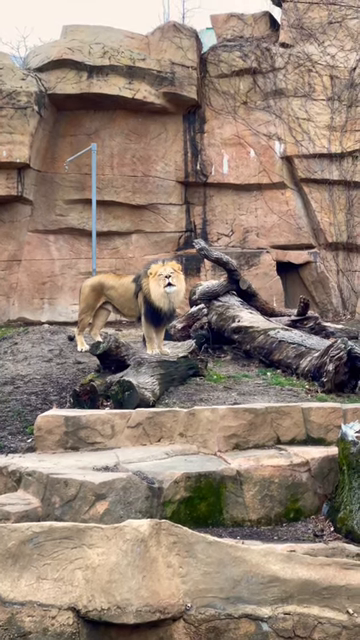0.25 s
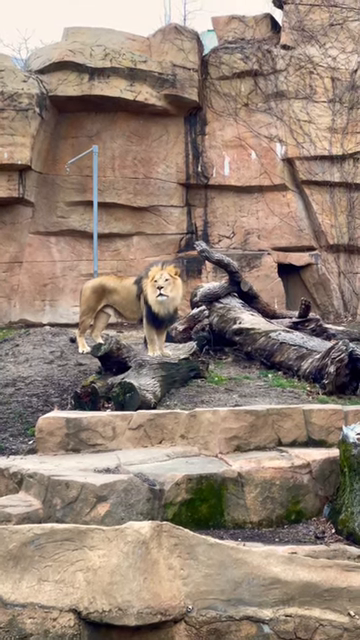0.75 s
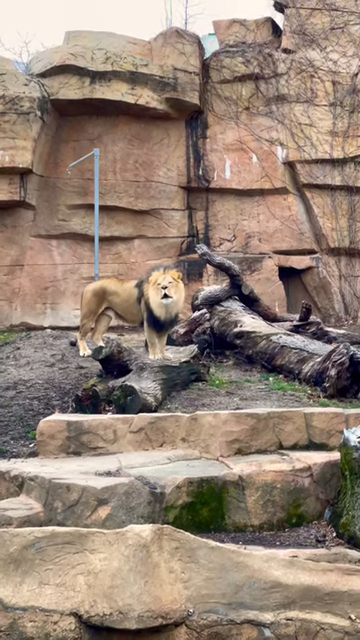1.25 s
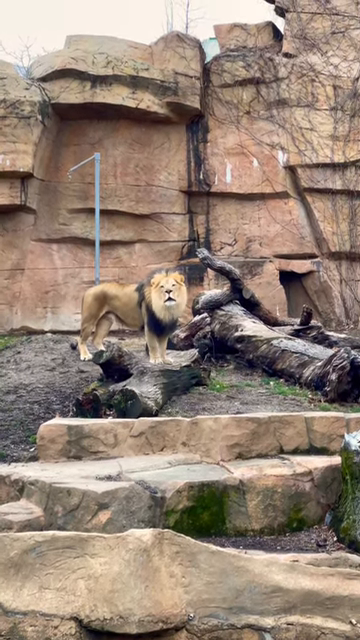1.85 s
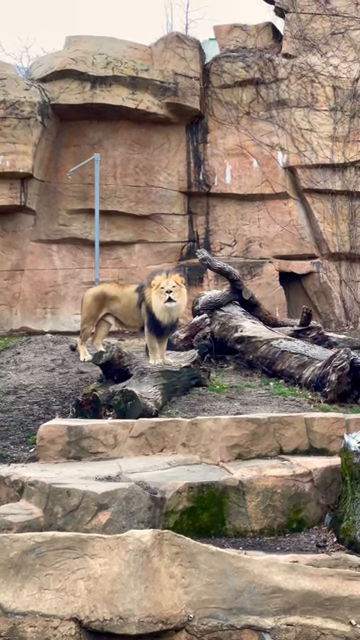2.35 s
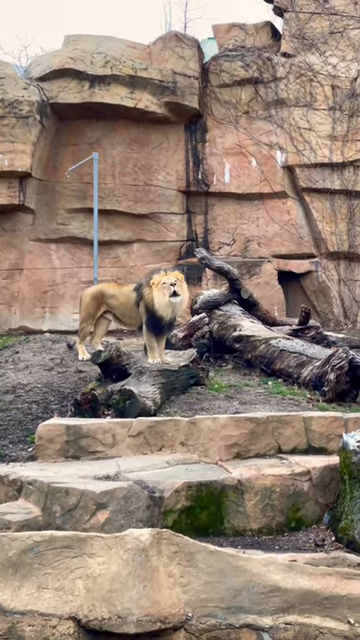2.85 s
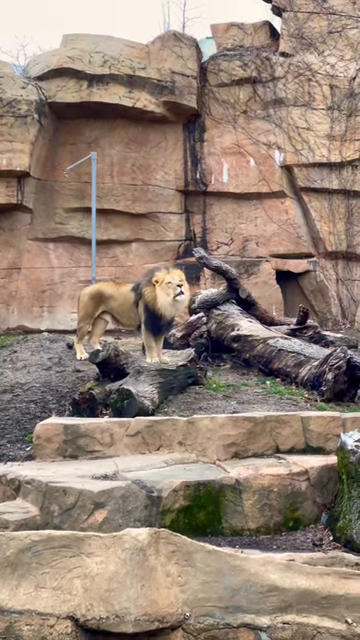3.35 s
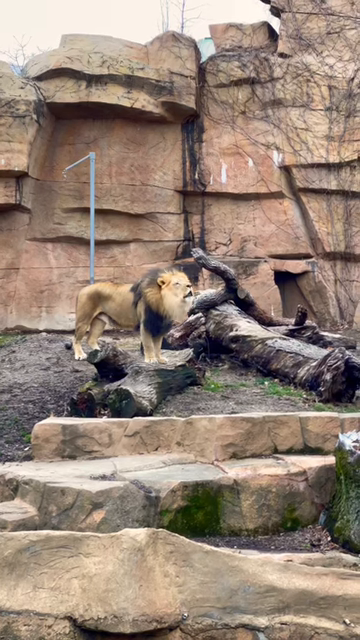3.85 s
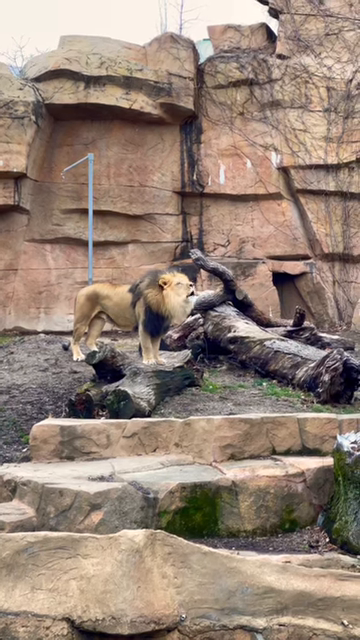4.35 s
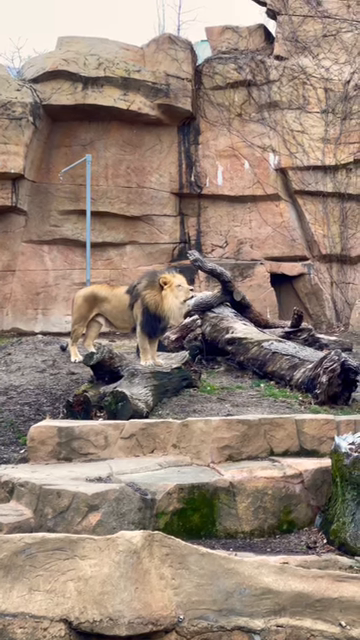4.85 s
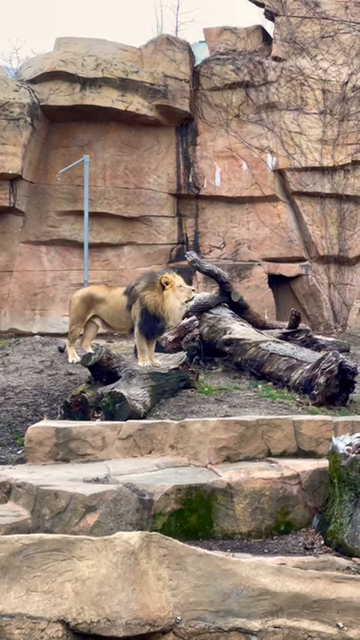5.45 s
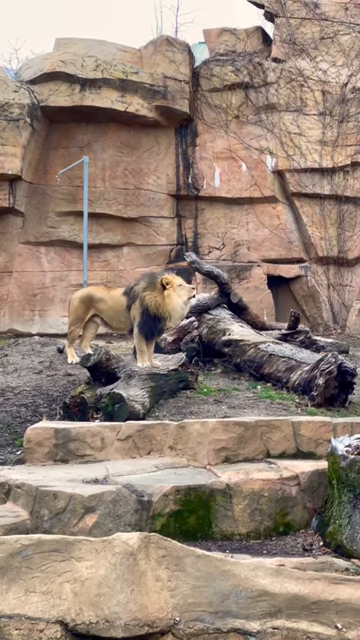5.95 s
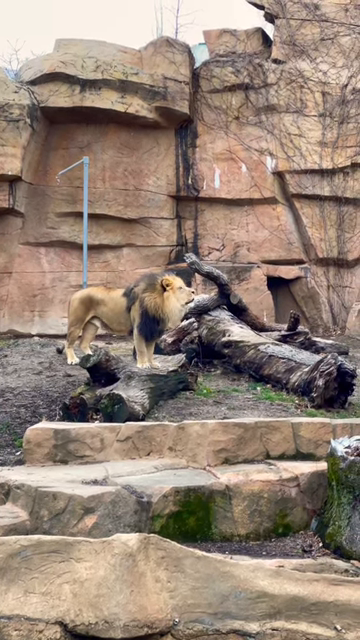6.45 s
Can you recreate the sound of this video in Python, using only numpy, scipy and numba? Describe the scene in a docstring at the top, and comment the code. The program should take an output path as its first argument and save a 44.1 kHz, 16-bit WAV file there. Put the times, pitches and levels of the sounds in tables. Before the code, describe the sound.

A lion gives five deep, rough, grunting roars, echoing off rock walls over a low rumble of distant traffic.

```python
"""A rock-walled outdoor enclosure: a lion grunts five deep roars some metres from a phone.
Each roar is a near-pure chest tone plus rough vocal-fold pulses with a low ring and mouth resonances,
a growl below and rushing breath above; it starts rough, clears, breaks into a creak and sags.
Lion and distant birds echo off the rock, over town rumble."""
import sys
import numpy as np
from scipy import signal
from scipy.fft import rfft, irfft, next_fast_len
from scipy.io import wavfile
from scipy.ndimage import uniform_filter1d
from numba import njit

SR = 44100
rng = np.random.default_rng(int(sys.argv[2]) if len(sys.argv) > 2 else 0)


def file_out(sig):
    """Save sig as 16-bit WAV at sys.argv[1]."""
    # one column per channel
    cols = np.atleast_2d(sig).T
    # limit, then scale
    lim = np.clip(cols, -1, 1)
    pcm = np.round(lim * 32767).astype(np.int16)
    wavfile.write(sys.argv[1], SR, pcm)


N = 295470

# roars (start [s], end [s])
ROAR_SPANS = [(0, .56), (1.23, 1.95), (2.47, 3.3), (4.08, 4.75), (5.65, 6.2)]
# narrow low resonances in the roar, probably the enclosure's (frequency [Hz], width [Hz], gain [dB])
LOW_RING_MODES = [(311.6, 59.7, 3.5), (436.2, 59.6, 0), (520.6, 56, -3), (663, 51, -6.5)]
# vocal tract resonances (frequency [Hz], width [Hz], gain [dB])
MOUTH_MODES = [(835, 64, -4.5), (948, 50, 1.5), (1084, 48, -5.5), (1360, 175, -15)]
PHARYNX_MODES = [(1954, 150, 4), (2420, 280, -5.5), (3110, 190, -3.5), (4280, 540, -8.5)]


def lion():
    """Fold pulses and breath drive the resonances. Returns (chest tone, rough voice)."""
    # per roar (time [s], voice [dB], mouth re low ring [dB], rasp [dB])
    effort = [
        [(0.0, -28, -3.5, -34), (0.006, -32.5, -6.5, -53), (0.102, -29.5, -8, -47.5), (0.126, -34, -5.5, -48),
         (0.144, -28, -9, -49), (0.26, -28, -7, -39.5), (0.358, -34.5, -7.5, -45.5), (0.364, -35.5, -14, -49.5),
         (0.56, -56, -3, -72.5)],
        [(1.23, -70, 0.5, -80.5), (1.284, -36, -2, -55.5), (1.354, -27, -12, -45.5), (1.364, -33, -3, -45.5),
         (1.606, -24, -12, -41), (1.736, -34.5, -4.5, -45), (1.754, -27.5, -14.5, -41), (1.772, -35, -9, -50.5),
         (1.95, -49, -6.5, -70.5)],
        [(2.47, -62, -3, -76.5), (2.584, -28.5, -4.5, -45), (2.718, -30.5, -10, -46.5),
         (2.834, -33.5, -0.5, -43), (3.038, -30, -2, -44), (3.05, -27, -14, -37), (3.074, -31.5, -5, -36),
         (3.148, -32, -12, -58.5), (3.3, -58.5, 0, -60.5)],
        [(4.08, -73, -10.5, -78), (4.164, -29, -6.5, -53.5), (4.234, -31.5, -3.5, -46.5),
         (4.268, -28, -11.5, -46), (4.356, -27.5, -6.5, -41.5), (4.522, -37.5, -2.5, -44.5),
         (4.538, -30, -5.5, -40), (4.582, -40, -1, -51), (4.75, -53, -14.5, -75)],
        [(5.65, -54, -17, -80), (5.664, -61, -9, -84), (5.732, -39, -13, -58), (5.834, -29, -11.5, -52),
         (5.864, -32, -2, -49), (5.886, -27.5, -12, -50.5), (5.98, -34.5, -4, -43.5), (6.112, -42.5, -9, -65.5),
         (6.2, -57, -10, -69)],
    ]
    # chest resonances (frequency [Hz], width [Hz], gain [dB])
    chest_modes = [(47.3, 49, -9.5), (87.6, 32, 7), (168, 49, -1.5)]
    voice_db, mouth_db, rasp_db = curves(effort)
    fold_state, (hiss_db, growl_db, mouth_hz, pharynx_hz) = roar_stages()
    source, air, rattle = vocal_folds(*fold_state)
    rasp = breath_rasp(source, air, pharynx_hz, hiss_db)
    low_ring = unit(ring(source, LOW_RING_MODES))
    voice = low_ring + undb(mouth_db) * vowel(source, MOUTH_MODES, mouth_hz, width_hz=220.)
    growl = unit(ring(rattle, chest_modes))
    roar = undb(voice_db) * voice + undb(rasp_db) * rasp + undb(growl_db) * growl
    t = np.arange(N) / SR
    roaring = sum((t >= start) & (t < end) for start, end in ROAR_SPANS)
    gate = uniform_filter1d(roaring * 1., SR // 25, mode="nearest")
    return gate * chest_tone(), gate * roar + fold_slaps()


def roar_stages():
    """Fold and tract curves: rough onset, clear moment, break, sagging end."""
    # per roar (clearest [s], break [s], pulse rate [Hz], roughness when clearest [0-1], break creak [0-1])
    breaks = [(.07, .24, 138, .5, .45), (1.4, 1.54, 137, .4, .6), (2.87, 3.05, 138, .12, .4),
              (4.25, 4.4, 125, .55, .3), (5.83, 5.94, 115, .3, .45)]
    # per roar (hiss re rasp [dB], growl at break [dB], mouth centre [Hz], pharynx centre [Hz])
    timbres = [(-5.5, -23.5, 928, 2770), (-4.5, -21.5, 966, 2600), (-3.5, -28, 1017, 2460),
               (-2, -24, 950, 2700), (-4, -28, 896, 2600)]
    onset_ratio, broken_ratio, end_ratio = .94, .87, .79  # of the clear pulse rate
    onset_rough, broken_rough, calm_creak = .58, .87, .1
    clearing_s, breaking_s = .06, .06
    growl_early_db, growl_db_per_s = -10.5, -22
    hiss_break_db, hiss_db_per_s = -1.5, -37.5
    folds, tract = [], []
    for (start, end), course, timbre in zip(ROAR_SPANS, breaks, timbres):
        clear_s, break_s, hz, rough, creak = course
        hiss_db, growl_db, *vowel_hz = timbre
        strain_s = break_s - breaking_s
        folds += [(start, onset_ratio * hz, onset_rough, calm_creak),
                  (clear_s - clearing_s, hz, onset_rough, calm_creak),
                  (clear_s, hz, rough, 0),
                  (strain_s, (1 + broken_ratio) / 2 * hz, (rough + broken_rough) / 2, calm_creak),
                  (break_s, broken_ratio * hz, broken_rough, creak),
                  (end, end_ratio * hz, broken_rough, creak / 2)]
        tract += [(s, hiss_db, growl_db + growl_early_db, *vowel_hz) for s in (start, strain_s)]
        tract += [(s, hiss_db + hiss_break_db + hiss_db_per_s * (s - break_s),
                   growl_db + growl_db_per_s * (s - break_s), *vowel_hz) for s in (break_s, end)]
    return curves([folds]), curves([tract])


def vocal_folds(hz, roughness, creak_share, creak_hz=45.28):
    """Folds flap unevenly: loose pulses, an air puff per cycle, a slow creak throbbing through both."""
    steady, phase = pulses(hz, jitter=.006, scatter_db=1.5)
    ragged, _ = pulses(hz, jitter=.3, scatter_db=2.5)
    creak, creak_phase = pulses(creak_hz * (1 + .08 * walk(12)), jitter=.0793, scatter_db=2.5)
    fold_noise, air_noise = rng.standard_normal((2, N))
    throb = undb(-14 * creak_share * creak_phase + 2.3 * walk(14))
    puffs = unit(fold_noise * np.exp(-phase / .55))
    loose = unit((unit(ragged) + .81 * puffs) * throb)
    flap = np.sqrt(1 - roughness) * unit(steady) + np.sqrt(roughness) * loose
    source = np.sqrt(1 - creak_share) * flap + np.sqrt(creak_share) * unit(creak)
    air = air_noise * (.5 + np.exp(-phase / 3.9)) * throb
    rattle = unit(creak) + 1.56 * fold_noise
    return source, air, rattle


def chest_tone():
    """Deep sine, wavering in level and pitch."""
    # per roar (time [s], level [dB], pitch [Hz])
    contours = [
        [(0, -22, 144), (.058, -20.5, 141), (.156, -19, 129), (.204, -7.5, 126.5), (.238, -22, 116.4),
         (.275, -5, 121), (.315, -22.5, 118.5), (.35, -17.5, 116.9), (.45, -29, 115), (.515, -21, 121),
         (.56, -32.5, 130)],
        [(1.23, -42, 128), (1.338, -11.5, 129), (1.44, -7.5, 128), (1.492, -17.5, 127), (1.528, -7.5, 126),
         (1.558, -18.5, 117.9), (1.64, -24, 119), (1.678, -16, 120), (1.71, -32, 124), (1.81, -22, 118),
         (1.95, -32.5, 100)],
        [(2.47, -53.5, 115), (2.54, -23, 130), (2.596, -9.5, 134), (2.654, -20, 130), (2.7, -8.5, 135),
         (2.735, -16, 141), (2.788, -9, 141), (2.872, -19, 141), (2.94, -10.5, 134), (3.03, -9, 130),
         (3.07, -16, 129), (3.16, -17, 128), (3.23, -23.5, 106), (3.3, -36, 110)],
        [(4.08, -57.5, 130), (4.14, -25, 128), (4.186, -11, 128), (4.245, -18, 128), (4.28, -13.5, 128),
         (4.345, -7.5, 127), (4.412, -21, 130), (4.495, -12.5, 131.7), (4.54, -25.5, 130), (4.56, -14.5, 130),
         (4.68, -34.5, 130), (4.75, -34.5, 128)],
        [(5.65, -51, 122), (5.74, -23.5, 121.2), (5.788, -35.5, 118), (5.838, -12, 116), (5.906, -22.5, 115.4),
         (5.952, -9, 116), (5.985, -27.5, 116), (6.11, -24, 110), (6.136, -42, 108), (6.2, -29.5, 106)],
    ]
    db, hz = curves(contours)
    swell = uniform_filter1d(undb(db + .5 * walk(40)), SR // 60)
    phase_rad = 2 * np.pi * np.cumsum(hz * (1 + .019 * walk(30))) / SR
    return np.sqrt(2) * swell * np.sin(phase_rad)


def breath_rasp(source, air, pharynx_hz, hiss_db):
    """Rushing breath and ringing pharynx, hiss on top."""
    # airflow spectra (frequency [Hz], level [dB])
    breath_spectrum = [(1300, -30), (1650, -6), (1950, -1.5), (2700, -7.5), (3500, -11.5), (4300, -10),
                       (5000, -9.5), (6000, -37)]
    hiss_spectrum = [(4000, -25), (5000, -8), (5500, -0.5), (7000, -5), (8500, -1.5), (10700, -2),
                     (11800, -17), (12400, -26.5), (12900, -58.5)]
    breath = unit(colour(air, breath_spectrum))
    pharynx = vowel(source, PHARYNX_MODES, pharynx_hz, width_hz=400.)
    return unit(breath + undb(-1) * pharynx) + undb(hiss_db) * unit(colour(air, hiss_spectrum))


def fold_slaps():
    """Single hard closures excite the low ring, mouth and pharynx."""
    # closures (time [s], relative level [dB])
    closures = [(0.166, -13.5), (0.241, -18), (0.266, -18), (0.31, -23), (1.256, -31.5), (1.286, -21.5),
                (1.498, -18), (1.54, -8), (1.56, -9.5), (1.604, -19), (1.629, -14.5), (1.649, -11),
                (2.541, -18.5), (2.577, -8.5), (2.592, -22.5), (2.837, -15.5), (2.977, -14.5), (3.049, -17),
                (4.143, -28.5), (4.166, -25), (4.278, -25), (4.346, -14), (4.395, -20), (5.849, -19.5),
                (5.889, -40), (5.936, -19.5)]
    time_s, db = np.transpose(closures)
    clicks = np.zeros(N)
    clicks[(time_s * SR).astype(int)] = undb(db)
    banks = [(LOW_RING_MODES, 31), (MOUTH_MODES, 29.5), (PHARYNX_MODES, 4)]
    return sum(undb(gain_db) * ring(clicks, modes) for modes, gain_db in banks)


def pulses(hz, jitter, scatter_db):
    """One click per cycle, jittered by a share of the period. Returns (clicks, phase 0-1)."""
    cycles = np.cumsum(hz) / SR
    due = np.flatnonzero(np.diff(np.floor(cycles)))
    lateness, size = rng.standard_normal((N // 100, 2))[:len(due)].T.clip(-2, 1.5)
    at = np.clip(due + jitter * lateness * SR / hz[due], 0, N - 1).astype(int)
    clicks = np.zeros(N)
    np.add.at(clicks, at, undb(scatter_db * size))
    return clicks, cycles % 1


def vowel(x, modes, centre_hz, width_hz, drift=.025):
    """Static resonances plus one that follows tongue and jaw."""
    hz = centre_hz * (1 + drift * walk(6))
    moving = sweep(sweep(x, hz, width_hz), hz, width_hz)
    return unit(unit(ring(x, modes)) + unit(moving))


def ring(x, modes):
    """Resonances in alternating sign, each applied twice to keep the valleys dark."""
    out = 0
    for k, (hz, width_hz, db) in enumerate(modes):
        b, a = signal.iirpeak(hz, hz / (1.475 * width_hz), SR)
        out = out + (-1) ** k * undb(db) * signal.lfilter(b, a, signal.lfilter(b, a, x))
    return out


@njit
def sweep(x, hz, width_hz):
    """State-variable band-pass with a moving centre."""
    out, band_state, low_state = np.empty(len(x)), 0., 0.
    for i in range(len(x)):
        g, damping = np.tan(np.pi * hz[i] / SR), width_hz / hz[i]
        band = (band_state + g * (x[i] - low_state)) / (1 + g * (g + damping))
        band_state = 2 * band - band_state
        low_state += 2 * g * band
        out[i] = damping * band
    return out


def rock_echo(x):
    """Rock walls: a noise tail whose bands die away at their own rates."""
    # echo bands (frequency [Hz], 60 dB decay [s], level [dB])
    bands = [(60, 2.76, 7), (130, 1.09, 6), (490, 1.09, 0.5), (2010, 0.94, 3.5), (4000, 0.78, 0.5),
             (7000, 0.76, 0), (12000, 0.43, -13.5)]
    t = np.arange(2 * SR) / SR
    noise = rfft(rng.standard_normal(len(t)))
    octave = np.log2(np.arange(SR + 1) / 2 + 1)
    centres_hz = np.transpose(bands)[0]
    tail = 0
    for hz, t60_s, db in bands:
        share = np.interp(octave, np.log2(centres_hz), centres_hz == hz)
        tail = tail + irfft(noise * share) * undb(db - 60 * t / t60_s)
    onset = np.clip(t / .0017, 0, 1)
    return signal.fftconvolve(x, tail * onset / np.sqrt(SR / 12))[:N]


def birds():
    """Far nasal callers and one small bird with noisy chirps."""
    # caws (start [s], length [s], pitch [Hz], end pitch [Hz], level [dB], gain above harmonic 2 [dB])
    caw_notes = [(0.885, 0.24, 685, 688, -62, -20.5), (2.065, 0.21, 746, 737, -59, -21),
                 (2.217, .24, 729, 720, -62, -20), (2.447, 0.071, 781, 800, -66, -16),
                 (3.68, 0.33, 731, 743, -64.5, -39), (4.89, 0.17, 676.5, 673, -67.5, -9),
                 (5.25, 0.18, 690, 688, -59, -10), (5.321, .2, 737, 753, -60, -11),
                 (6.129, 0.3, 668.5, 663, -59, 2.5), (6.444, .17, 650, 651, -60.5, -9),
                 (6.597, 0.13, 786, 748, -62, -6)]
    # caw harmonics (multiple, level [dB])
    caw_harmonics = [(1, -7.5), (2, 2.5), (3, -16), (5, -22), (6, -16.5), (7, -22.5), (8, -20.5),
                     (9, -26.5)]
    # chirps (start [s], length [s], nominal pitch [Hz], nominal end pitch [Hz], level [dB])
    chirp_notes = [(1.065, 0.05, 3900, 3320, -69.5), (2.36, 0.073, 3476, 3350, -66),
                   (3.86, .045, 3620, 3100, -69), (3.94, 0.06, 3530, 3110, -70),
                   (5.165, 0.049, 4440, 3510, -73), (5.213, .04, 3755, 3690, -66.5)]
    caws = sum(bird_note(*note, [(m, db + top_db * (m > 2)) for m, db in caw_harmonics])
               for *note, top_db in caw_notes)
    caws = caws * undb(4 * walk(35))
    chirps = sum(bird_note(*note, partials=[(.97, .0024)]) for note in chirp_notes)
    return caws + chirps * walk(1200)


def bird_note(start_s, length_s, hz, end_hz, db, partials):
    """Gliding, wavering partials (multiple, level [dB]) under a smooth swell."""
    progress = np.clip((np.arange(N) / SR - start_s) / length_s, 0, 1)
    pitch_hz = (hz + (end_hz - hz) * progress) * (1 + .003 * walk(40))
    phase_rad = 2 * np.pi * np.cumsum(pitch_hz) / SR
    swell = undb(db) * np.sin(np.pi * progress ** .45)
    return swell * sum(undb(partial_db) * np.sin(m * phase_rad) for m, partial_db in partials)


def town(level_db=-37.5):
    """Distant traffic and air, swelling slowly and flickering."""
    # rumble spectrum (frequency [Hz], level [dB])
    spectrum = [(12, -60), (20, -31), (64, -1.5), (101, -4), (129, 0.5), (156, -8.5), (215, -17),
                (435, -27), (554, -29.5), (1090, -33.5), (1510, -34), (1720, -41.5), (3770, -58),
                (8950, -72.5), (12700, -74), (16500, -101), (22000, -120)]
    rumble = unit(colour(rng.standard_normal(N), spectrum))
    return undb(level_db + walk(.55) + 1.14 * walk(12)) * rumble


def undb(db):
    return 10 ** (np.asarray(db) / 20)


def unit(x):
    return x / np.sqrt(np.mean(x ** 2))


def walk(rate_hz):
    """Random steps, smoothed twice; RMS 1."""
    hold = int(SR / rate_hz)
    steps = np.repeat(rng.standard_normal(N // hold + 1), hold)
    return unit(uniform_filter1d(uniform_filter1d(steps, hold), hold)[:N])


def curves(tables):
    """Per-sample columns from tables of (time [s], value, ...)."""
    time_s, *columns = np.transpose(np.concatenate(tables))
    return [np.interp(np.arange(N) / SR, time_s, column) for column in columns]


def colour(x, spectrum, ends="even"):
    """Filter by (frequency [Hz], gain [dB]) points on a log axis."""
    points_hz, db = np.transpose(spectrum)
    return shape(x, lambda hz: undb(np.interp(np.log(hz + 1), np.log(points_hz + 1), db)), ends)


def shape(x, gain, ends="odd"):
    """Filter by gain(Hz); mirrored ends keep the edges clean."""
    size, pad = next_fast_len(N + SR), SR // 2
    wide = np.pad(x, (pad, size - N - pad), "reflect", reflect_type=ends)
    hz = np.arange(size // 2 + 1) * SR / size
    return irfft(rfft(wide) * gain(hz), size)[pad:pad + N]


def scene():
    """Stereo: one mix, phase-shifted between left and right, plus a differently echoed side signal."""
    # left-right phase, held fully in or out of phase in some bands (frequency [Hz], phase [rad])
    stereo_phase = [(0, 0), (300, 0), (600, -.15), (900, 0), (1300, -.2), (1500, 0), (1800, 0), (2500, .65),
                    (4000, .65), (4500, 1.4), (4850, 3.14), (5250, 5.4), (5700, 6.28), (6200, 6.28),
                    (7500, 8.1), (8750, 9.42), (9550, 9.42), (10000, 10), (11500, 11.6), (11800, 12.57),
                    (13000, 12.57)]
    # stereo width, the side signal dropping away in some bands (frequency [Hz], side gain [dB])
    stereo_width = [(25, -25.5), (60, -48.5), (150, -42.5), (230, -30), (350, -26), (700, -13.5),
                    (1300, -16.5), (1700, -28), (2500, -24), (5000, -9.5), (5950, -39), (7000, -11),
                    (11200, -16.5), (12000, -37.5)]
    echo_db, tone_echo_db = -8, -16
    tone, voice = lion()
    flock = birds()
    direct = tone + voice + flock
    to_walls = undb(echo_db) * (voice + flock) + undb(tone_echo_db) * tone
    mix = direct + rock_echo(to_walls) + town()
    side = colour(rock_echo(direct) + town(), stereo_width, "odd")
    points_hz, phase_rad = np.transpose(stereo_phase)
    left = shape(mix, lambda hz: np.exp(.5j * np.interp(hz, points_hz, phase_rad)))
    right = shape(mix, lambda hz: np.exp(-.5j * np.interp(hz, points_hz, phase_rad)))
    return np.array([left + side, right - side])


def record(dry):
    """The phone cuts the top."""
    cutoff_hz = 12866
    return signal.sosfilt(signal.ellip(10, .2, 60, cutoff_hz, fs=SR, output="sos"), dry)


dry = scene()
out = record(dry)
file_out(out)
```